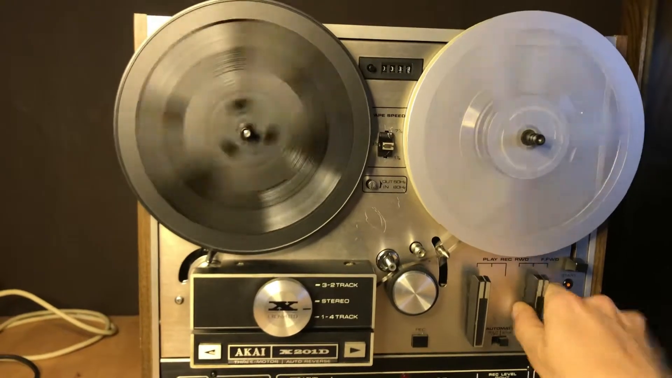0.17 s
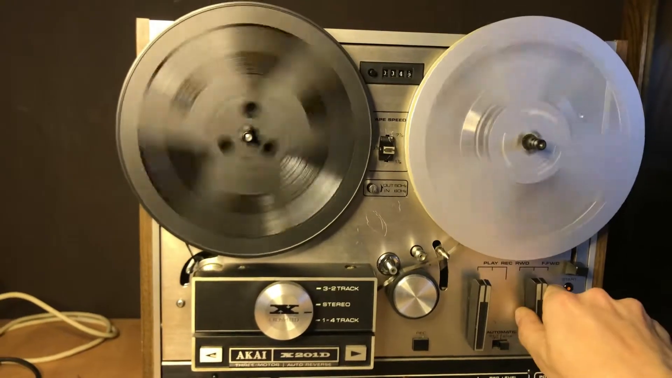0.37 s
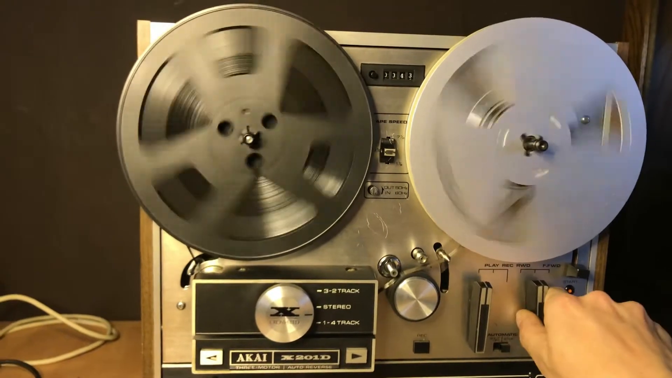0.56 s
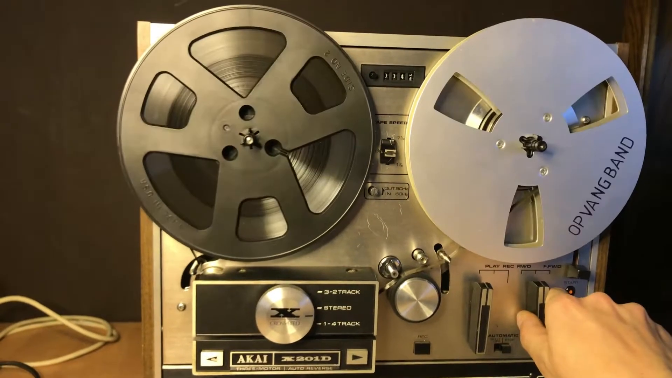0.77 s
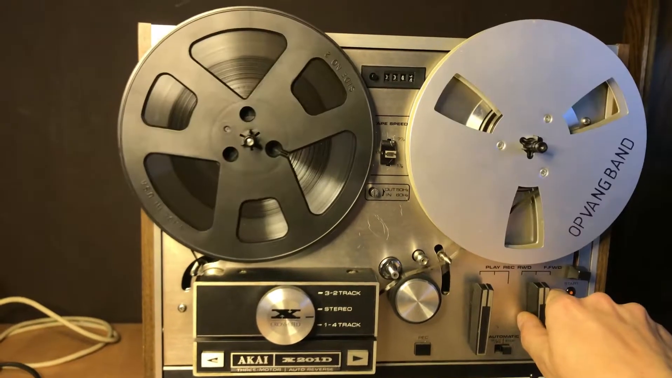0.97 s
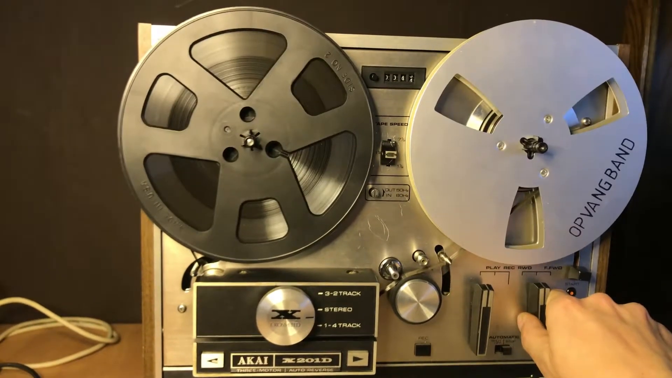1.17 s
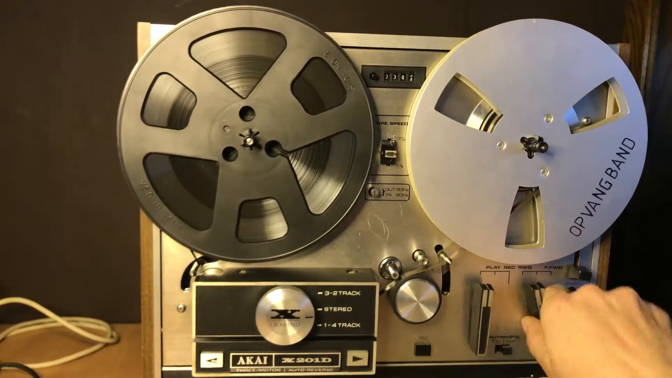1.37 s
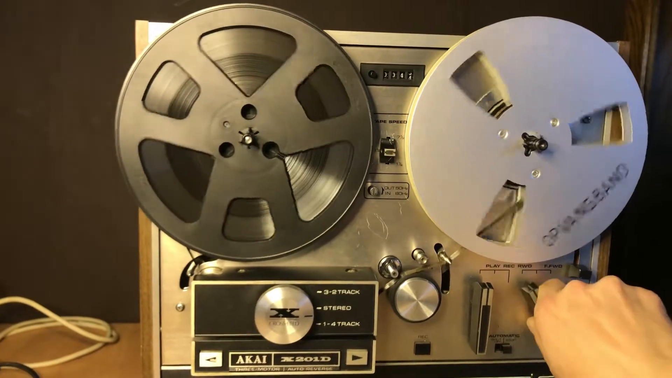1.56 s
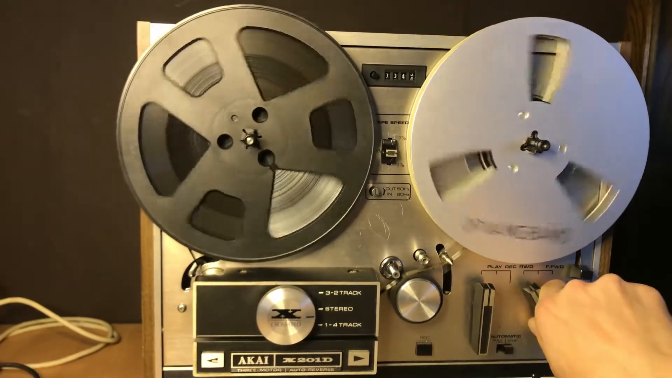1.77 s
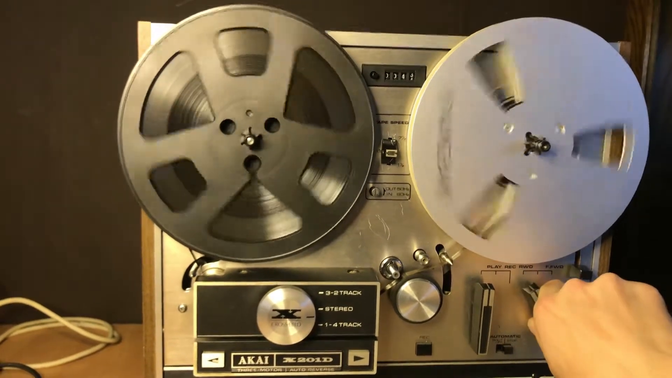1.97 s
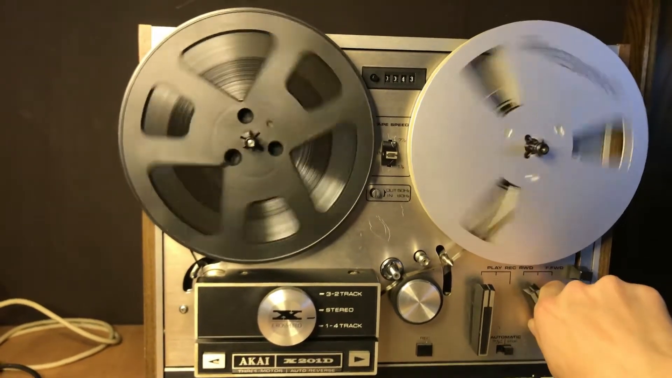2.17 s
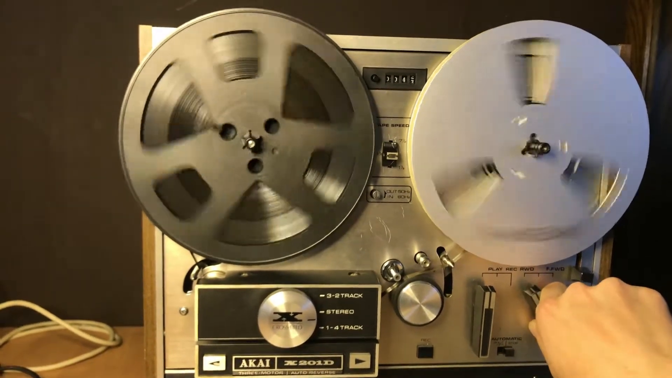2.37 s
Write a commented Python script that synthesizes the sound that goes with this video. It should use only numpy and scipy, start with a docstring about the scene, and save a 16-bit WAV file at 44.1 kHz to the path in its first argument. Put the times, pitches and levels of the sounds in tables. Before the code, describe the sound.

A tape deck's fast-winding hiss is cut by a hard lever clack, brakes squeak, then a softer clack

```python
"""Tape hisses past at full winding speed until a lever clacks and snaps the deck to stop.
The brake bands grab, chatter and squeak as rubbing noise, stick-slip clicks and a falling squeak, with
brief rough tones around them, until the reels stand. The motor idles on as hum and rumble, then a second
lever throw clacks through its linkage as noise snaps and ringing chassis modes.
The reels start turning slowly: faint air and ticks."""
import sys
import numpy as np
from scipy import signal
from scipy.fft import rfft, irfft
from scipy.io import wavfile
from scipy.ndimage import uniform_filter1d

SR = 44100
rng = np.random.default_rng(int(sys.argv[2]) if len(sys.argv) > 2 else 0)


def waveform_to_disk(signal):
    """Save audio, clipped to [-1, 1], as 16-bit WAV at the path in sys.argv[1]."""
    frames = np.transpose(np.atleast_2d(signal))
    scaled = np.clip(frames, -1, 1) * 32767
    samples = np.round(scaled).astype(np.int16)
    wavfile.write(sys.argv[1], SR, samples)


N = 105840
T = np.arange(N) / SR  # seconds


def amp(db):
    """Turn decibels into a linear gain."""
    return 10 ** (np.asarray(db) / 20)


def even(x):
    """Scale a signal to an RMS of one."""
    return x / np.sqrt(np.mean(x ** 2) + 1e-20)


def colour_at(points, hz):
    """Read a spectrum's dB between its points, along a logarithmic frequency axis."""
    point_hz, point_db = np.transpose(points)
    return np.interp(np.log(hz + 1), np.log(point_hz + 1), point_db)


def along(rows, col=1):
    """Draw one column of a table as a line over the whole scene."""
    columns = np.transpose(rows)
    return np.interp(T, columns[0], columns[col])


def add(mix, start_s, sound):
    """Lay a sound into the mix in place, cut off at the end of the scene."""
    part = mix[round(start_s * SR):][:len(sound)]
    part += sound[:len(part)]


def hiss(shape_db, patchy_db=0, size=N):
    """Coloured noise from random short-time spectra with drifting louder and softer patches."""
    frames, hz = size // 128 + 5, np.fft.rfftfreq(512, 1 / SR)
    real, imaginary, patches = rng.standard_normal((3, len(hz), frames))
    patches = uniform_filter1d(patches, size=5, axis=0)  # blur over frequency
    patches = even(uniform_filter1d(patches, size=8, axis=1))  # blur over time
    spectra = (real + 1j * imaginary) * amp(shape_db(hz)[:, None] + patchy_db * patches)
    noise = signal.istft(spectra, nperseg=512, noverlap=384)[1]
    return even(noise[:size])


def resonate(x, hz, width_hz):
    """A resonance that can glide: shift its pitch down to zero, smooth, and shift back up."""
    turn = np.exp(2j * np.pi * np.cumsum(hz * np.ones(len(x))) / SR)
    pole = np.exp(-np.pi * width_hz / SR)
    smoothed = signal.lfilter([1 - pole], [1, -pole], x / turn)
    return 2 * (turn * smoothed).real


def ring(modes, near_hz=None):
    """One blow on a set of decaying modes, each caught a little differently."""
    scatter_db, detune = 1, 0.012  # detune is a share of the mode's pitch
    favour_db = 10  # loss per octave away from the favoured mode
    t, (hz, db, t60) = T[:SR // 3, None], np.transpose(modes)
    level_luck, phase_luck, pitch_luck = rng.uniform(-1.015, 1, (3, len(hz)))
    hz = hz * (1 + detune * pitch_luck)
    if near_hz:
        db = db - favour_db * abs(np.log2(hz / near_hz))
    decay = amp(db + scatter_db * level_luck - 60 * t / t60)
    modes_ringing = decay * np.sin(2 * np.pi * hz * t + np.pi * phase_luck)
    return modes_ringing.sum(1) * np.minimum(t[:, 0] / 0.00042, 1)  # 0.42 ms attack


def snap(colour, tilt_db, t60):
    """A short burst of coloured noise with a sudden start; the tilt is in dB per 8 kHz."""
    t = T[:4096]
    shape = amp(-60 * t / t60) * np.minimum(t / 0.00018, 1)  # 0.18 ms attack
    burst = shape * hiss(lambda hz: colour(hz) + tilt_db * (hz / 8000 - .5), size=4096)
    return burst * np.linalg.norm(shape) / np.linalg.norm(burst)  # same energy for every draw


# Steady motor orders. Each row: frequency in Hz, RMS level in dB.
HUM_LINES = [(119, -75), (301, -74), (399.5, -68), (549.5, -72.5), (775, -83)]
# Swell of the low rumble. Each row: time in seconds, RMS level of the steady rumble in dB.
RUMBLE_LEVEL = [(0, -77), (.2, -58), (.4, -67), (.52, -55), (.7, -64), (.82, -72), (.92, -66.5),
                (1.4, -64.5), (1.6, -56.5), (2.4, -65.5)]
# Colour of the room's floor. Each row: frequency in Hz, density in dB per Hz.
FLOOR_COLOUR = [(25, -17), (45, -2.5), (200, -8.5), (400, -9.5), (650, -13), (750, -18.5), (1200, -20),
                (4900, -32.5), (15600, -32.5)]


def motor():
    """Wavering hum lines of the motor, a fuzzy low rumble and the room's floor."""
    rumble_hz, rumble_width_hz = 52.5, 8.4
    floor_db = -63.5
    hum = np.zeros(N)
    for hz, db in HUM_LINES:
        tone = np.sin(2 * np.pi * (hz * T + rng.random()))
        waver = 0.12 * even(resonate(rng.standard_normal(N), hz, 1))
        hum += amp(db) * even(tone + waver)
    low = resonate(rng.standard_normal(N), rumble_hz, rumble_width_hz)
    rumble = even(resonate(low, rumble_hz, 2 * rumble_width_hz))
    hz = np.fft.rfftfreq(N, 1 / SR)
    floor_spectrum = rfft(rng.standard_normal(N)) * amp(colour_at(FLOOR_COLOUR, hz)) * (hz > 20)
    floor = even(irfft(floor_spectrum, N))
    return hum + amp(along(RUMBLE_LEVEL)) * rumble + amp(floor_db) * floor


# Dull bumps through the table. Each row: start in seconds, level in dB, pitch at the start in Hz.
TABLE_BUMPS = [(0.742, -44.5, 132), (1.5, -49, 200), (2.04, -40.5, 152), (2.065, -40, 129),
               (2.215, -42.5, 130)]


def bumps():
    """A low swing or two whose pitch sags."""
    sag, t60 = 0.53, 0.043  # share of the pitch lost, seconds
    out, t = np.zeros(N), T[:SR // 5]
    for start_s, db, hz in TABLE_BUMPS:
        sagging_hz = hz * (1 - sag * (1 - np.exp(-t / 0.0166)))
        turns = np.cumsum(sagging_hz) / SR
        add(out, start_s, amp(db - 60 * t / t60) * np.sin(2 * np.pi * turns))
    return out


# Broad colour of the tape and air noise. Each row: frequency in Hz, density in dB per Hz.
WIND_HISS = [(150, -2), (270, -22), (600, -10), (3000, -7.5), (7000, -13), (7900, -33), (11500, -26),
             (13500, -11), (15600, -7)]
# Peaks standing out of it. Each row: frequency in Hz, width in Hz, height above the hiss in dB.
WIND_RESONANCES = [(506, 21, 16), (2233, 76, 13), (3804, 270, 12.5), (4520, 84, 17), (5720, 77, 23)]


def wind_colour(hz):
    """The broad hiss with rounded resonant peaks on top, in dB."""
    peaks = sum(db / (1 + (2 * (hz - f) / width) ** 2) for f, width, db in WIND_RESONANCES)
    return colour_at(WIND_HISS, hz) + peaks


# Tape and reels running. Each row: time in seconds, level in dB before the extra treble loss.
WINDING_LEVEL = [(0, -52), (.3, -46), (.42, -52.5), (.49, -63), (.72, -70), (.8, -94), (1.45, -93),
                 (1.6, -78.5), (2.2, -70), (2.4, -67)]
# Soft ticks of the slowly turning reels. Each row: start in seconds, level in dB.
REEL_TICKS = [(1.905, -62), (2.368, -56.5)]


def winding():
    """Tape over the guides and air off the spokes; the slow reels tick now and then."""
    whistle_hz, whistle_fall = 9200, 0.17  # split, extra treble loss in dB per dB of level drop
    level_db, air = along(WINDING_LEVEL), hiss(wind_colour, patchy_db=1.3)
    low = signal.sosfiltfilt(signal.butter(2, whistle_hz, fs=SR, output="sos"), air)
    whistle = (air - low) * amp(whistle_fall * (level_db - level_db[0]))
    out = amp(level_db) * (low + whistle)
    for start_s, db in REEL_TICKS:
        add(out, start_s, amp(db) * snap(wind_colour, tilt_db=-3, t60=0.051))
    return out


# Short tones. Each row: centre in seconds, half length in seconds, pitch at the centre in Hz,
# glide in Hz per second, level of the pure tone in dB.
SHORT_TONES = [(0.37, 0.045, 224.5, 0, -53), (0.507, 0.025, 414, 0, -55), (.458, .014, 2330, -11000, -48),
               (.478, .009, 1485, 0, -44), (.502, .02, 1475, 0, -55), (.536, .008, 2175, 0, -51),
               (0.552, 0.015, 1578, 2000, -45), (.564, .008, 2100, -2000, -47), (.54, .016, 5200, 0, -56),
               (.605, 0.035, 5140, -1500, -59), (.785, .022, 1430, -4500, -66)]


def short_tones():
    """Brief tones, steady or gliding, swell and fade, roughened by gritty noise."""
    roughness, spread = .5, .04  # rasp RMS beside the tone's peak, rasp width as a share of the pitch
    grit = rng.standard_normal(N) * amp(4.2 * rng.exponential(1, N))
    out = np.zeros(N)
    for centre_s, half_s, hz, glide, db in SHORT_TONES:
        bend_hz = hz + glide * np.clip(T - centre_s, -2 * half_s, 2 * half_s)
        tone = np.sin(2 * np.pi * np.cumsum(bend_hz) / SR)
        rasp = roughness * even(resonate(grit, bend_hz, spread * hz))
        swell = np.exp(-((T - centre_s) / half_s) ** 2)
        out += amp(db) * swell * (tone + rasp)
    return out


# Colour of the rubbed drums. Each row: frequency in Hz, density in dB per Hz.
DRUM_HISS = [(400, -16.5), (700, -16.5), (1400, -8), (2300, -7), (6600, -7), (9200, -15.5), (12500, -14),
             (15600, -11.5)]


def drum_colour(hz):
    """Spectrum of a brake drum excited by friction, in dB."""
    return colour_at(DRUM_HISS, hz)


# Brake bands rubbing the drums. Each row: time in seconds, hiss level in dB.
RUBBING_LEVEL = [(.425, -53), (.44, -46), (.482, -48), (.495, -55), (.507, -66), (.518, -57), (.526, -49),
                 (.542, -50), (.551, -61), (.56, -49), (.58, -49.5), (.6, -52), (.668, -54), (.72, -57),
                 (.78, -70.5), (.83, -82)]


def rubbing():
    """Brake bands rub the drums as patchy coloured hiss."""
    return amp(along(RUBBING_LEVEL)) * hiss(drum_colour, patchy_db=5.0)


# Ringing modes of a brake drum. Each row: frequency in Hz, level in dB, 60 dB decay in seconds.
DRUM_MODES = [(1440, -8, 0.042), (2230, -3, 0.024), (3750, -2, 0.035), (6720, 0, 0.033), (8940, 4, 0.017),
              (12800, 3, 0.025)]
# Stick-slip runs of the brake. Each row: start in seconds, length in seconds, slips per second,
# level in dB, change of level over the run in dB.
CHATTER_RUNS = [(0.438, 0.04, 177, -32, 0.5), (.524, 0.029, 134, -34, -14.5),
                (0.557, 0.017, 125, -37.5, 0.5)]


def chatter():
    """The band sticks and slips in quick runs; every slip clicks and rings the drum."""
    ring_db, spread_db, jitter_s = -11, 1.5, 0.00055
    out = np.zeros(N)
    for start_s, length_s, rate, db, fade_db in CHATTER_RUNS:
        for later_s in np.arange(int(length_s * rate) + 1) / rate:
            click = snap(drum_colour, tilt_db=4.3, t60=0.015)
            size = amp(db + fade_db * later_s / length_s + spread_db * rng.standard_normal())
            # the first slip of a run falls exactly on its start
            at = start_s + later_s + (later_s > 0) * jitter_s * rng.standard_normal()
            add(out, at, size * click)
            add(out, at, size * amp(ring_db) * ring(DRUM_MODES))
    return out


# The long falling squeak. Each row: time in seconds, pitch in Hz, RMS level of its noise part in dB.
SQUEAK_PATH = [(.615, 3950, -80), (.65, 3810, -53), (.665, 3730, -50), (.685, 3550, -59),
               (.71, 3376, -58.5), (.75, 3410, -85)]


def squeak():
    """One band squeaks downward as the reel stops: a gliding tone inside a narrow band of noise."""
    hz, db = along(SQUEAK_PATH), along(SQUEAK_PATH, 2)
    tone = 1.8 * np.sin(2 * np.pi * np.cumsum(hz) / SR)
    breath = even(resonate(rng.standard_normal(N), hz, width_hz=130))
    sounding = (T > SQUEAK_PATH[0][0]) * (T < SQUEAK_PATH[-1][0])
    return amp(db) * (tone + breath) * sounding


# Colour of a lever snap. Each row: frequency in Hz, density in dB per Hz before the tilt.
SNAP_COLOUR = [(300, -7), (600, -4), (2500, 1.5), (5000, -2.5), (15600, -8)]
# Ringing modes of the chassis. Each row: frequency in Hz, level in dB, 60 dB decay in seconds.
CHASSIS_MODES = [(374, -5, 0.094), (476, -13, 0.1), (532.6, 0.5, 0.096), (810, -9.5, 0.066),
                 (916, -6, 0.069), (1130, -19.5, 0.28), (1358, -6, 0.053), (2310, -3.5, 0.018),
                 (2944, -7.5, 0.049), (3220, -2.5, 0.03), (14750, 2, .007)]
# Blows of lever and linkage. Each row: start in seconds, snap level in dB, treble tilt in dB per 8 kHz,
# 60 dB decay of the snap in seconds, chassis level in dB, favoured mode in Hz.
LEVER_CLACKS = [(0.2477, -22, 6.5, 0.05, -31, 2360), (0.2499, -22, 2.5, 0.024, -24, 2320),
                (.251, -21.5, 2.5, 0.046, -28, 554), (.262, -62, -4, 0.08, -33, 600),
                (.272, -37.5, -54, 0.16, -31.5, 540), (1.392, -59.5, -10, 0.092, -50, 1860),
                (1.418, -41, -4, 0.046, -33, 3200), (1.422, -44, -13, 0.069, -31, 1270),
                (1.4257, -47, -11, 0.19, -34, 396), (1.449, -44, 0.5, 0.068, -41.5, 3000),
                (1.467, -38.5, 7.5, 0.055, -30.5, 14500), (1.476, -47, -2.5, 0.092, -58, 2500),
                (1.498, -44, 4, 0.068, -39, 790), (1.508, -51, -68, 0.17, -41, 600)]


def levers():
    """Each part of the linkage snaps as a noise burst and knocks the chassis into ringing."""
    out = np.zeros(N)
    for start_s, db, tilt_db, t60, chassis_db, near_hz in LEVER_CLACKS:
        add(out, start_s, amp(db) * snap(lambda hz: colour_at(SNAP_COLOUR, hz), tilt_db, t60))
        add(out, start_s, amp(chassis_db) * ring(CHASSIS_MODES, near_hz))
    return out


def room(x):
    """A short noisy tail whose treble dies first."""
    body_t60, treble_t60, treble_hz = 0.31, 0.28, 4760  # seconds, seconds, split in Hz
    t, noise = T[:SR // 2], rng.standard_normal(SR // 2)
    low = signal.sosfiltfilt(signal.butter(1, treble_hz, fs=SR, output="sos"), noise)
    tail = low * amp(-60 * t / body_t60) + (noise - low) * amp(-60 * t / treble_t60)
    tail *= np.minimum(t / 0.0067, 1)  # 6.7 ms build-up
    return signal.fftconvolve(x, tail / np.linalg.norm(tail))[:N]


def scene():
    """Levers, brakes and short tones get the room's tail; winding, bumps and motor stay without it."""
    room_db = -10.5
    brakes = rubbing() + chatter() + squeak()
    near = levers() + brakes + short_tones()
    mix = near + amp(room_db) * room(near) + winding() + bumps() + motor()
    return mix[None]


def record(dry):
    """A narrow dip near 10.5 kHz and a steep treble limit near 15.8 kHz."""
    dip_hz, dip_width_hz, dip_depth = 10500, 390, 0.71
    edge_hz = 15780
    heard = dry - dip_depth * resonate(dry[0], dip_hz, dip_width_hz)
    treble_limit = signal.firwin(1023, edge_hz, window=("kaiser", 9), fs=SR)
    return signal.oaconvolve(heard, treble_limit[None], "same")


dry = scene()
out = record(dry)
waveform_to_disk(out)
```